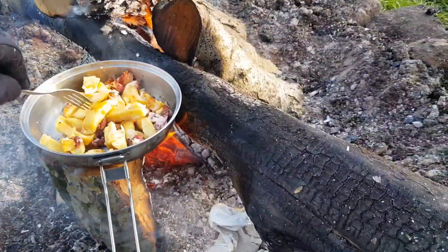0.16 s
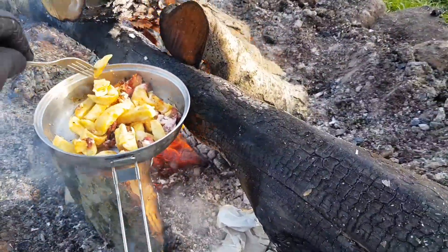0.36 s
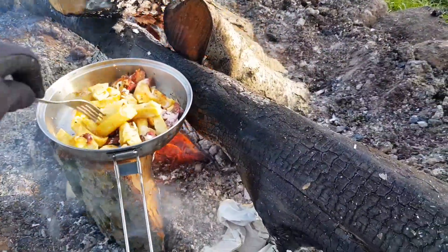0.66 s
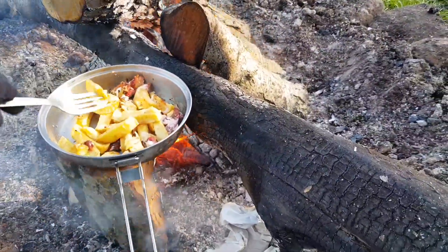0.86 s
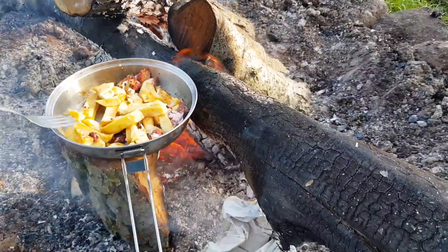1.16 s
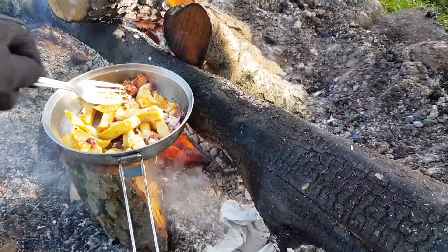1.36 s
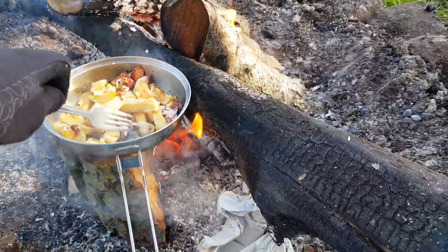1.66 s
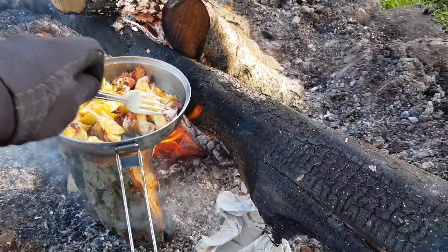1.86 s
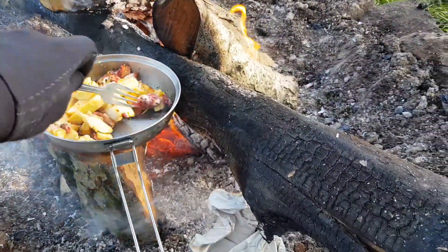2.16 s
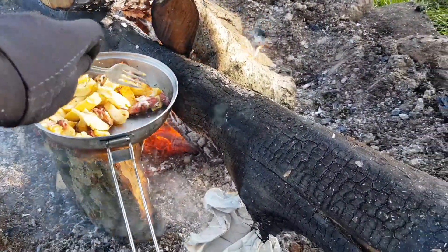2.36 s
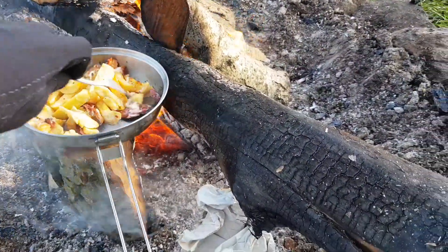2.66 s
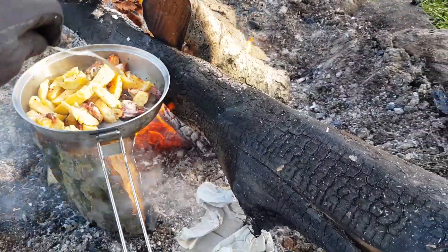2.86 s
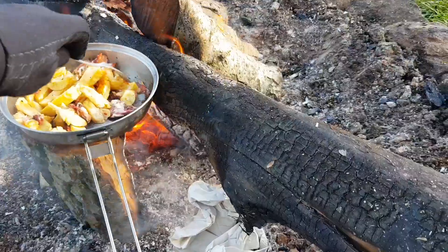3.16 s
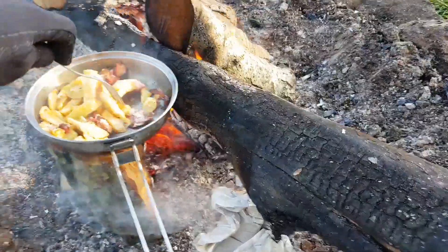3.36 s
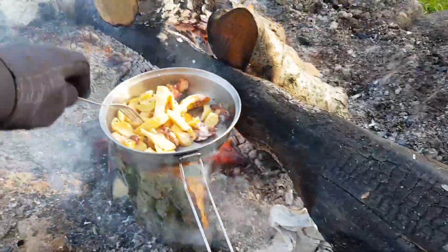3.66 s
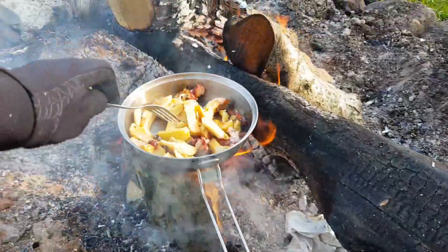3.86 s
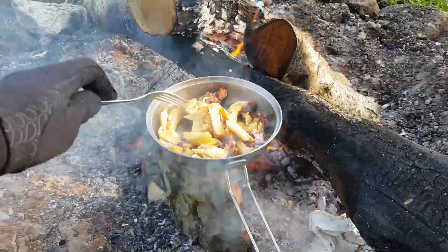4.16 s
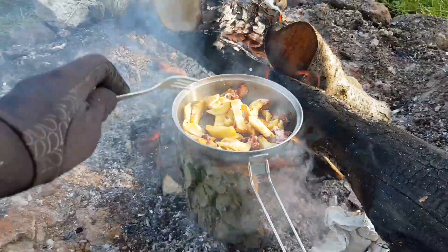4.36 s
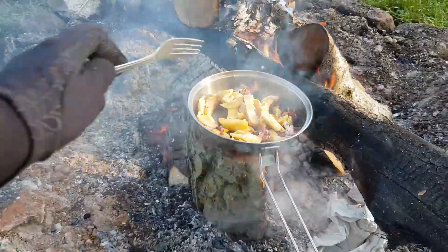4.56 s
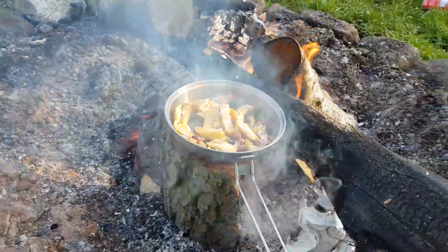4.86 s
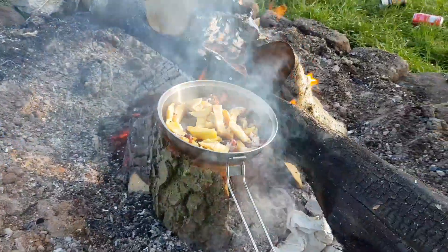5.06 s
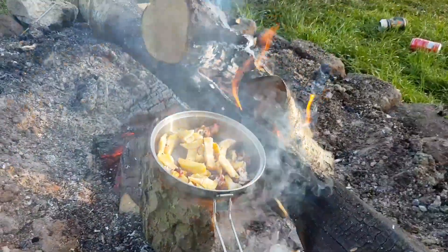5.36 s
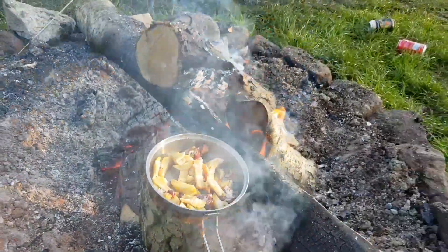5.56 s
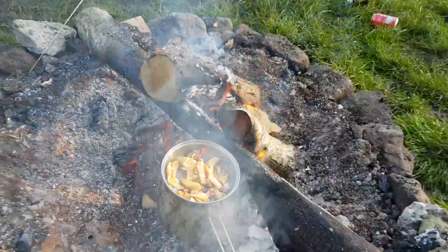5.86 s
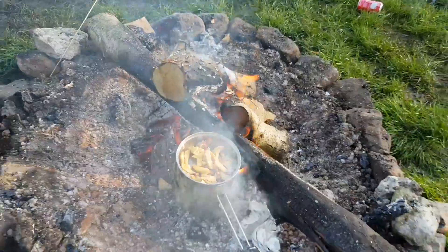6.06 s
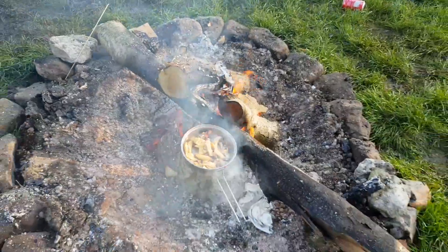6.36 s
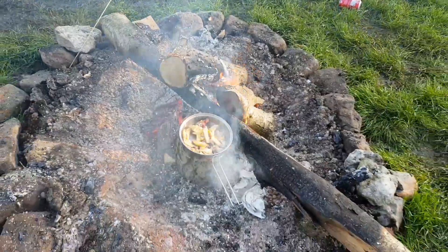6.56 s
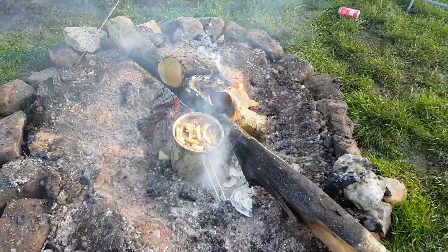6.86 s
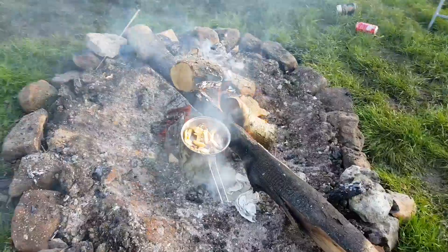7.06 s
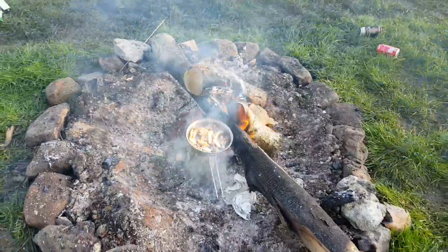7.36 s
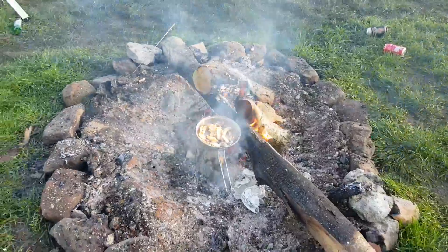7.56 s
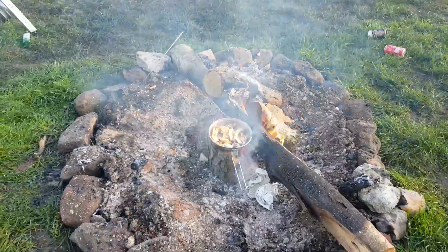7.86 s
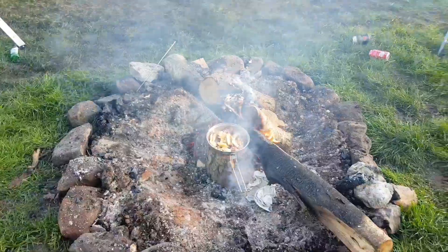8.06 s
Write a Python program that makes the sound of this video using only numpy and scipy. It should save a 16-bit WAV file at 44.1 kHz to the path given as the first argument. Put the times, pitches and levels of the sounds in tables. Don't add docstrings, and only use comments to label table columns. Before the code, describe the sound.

Hot fat snaps brightly over an uneven sizzle in the open air, above a faint steady rumble. Fork tines ring the pan around one second, then stirring makes the frying surge. A second strong swell comes midway. As the stereo microphone retreats, cracks grow sparse and faint; near the end wind buffets the right side while thin birdsong repeats far left.

```python
import sys
import numpy as np
from scipy import signal
from scipy.fft import rfft, irfft
from scipy.io import wavfile
from scipy.ndimage import uniform_filter1d

SR = 44100
rng = np.random.default_rng(int(sys.argv[2]) if len(sys.argv) > 2 else 0)


def makeup_ratio(level_db):
    decades = np.asarray(level_db, float) / 20
    return 10 ** decades


def log_audio(samples):
    frames = np.atleast_2d(samples).T
    limited = np.clip(frames, -1, 1)
    pcm = np.round(limited * 32767).astype(np.int16)
    wavfile.write(sys.argv[1], SR, pcm)


N = 362579

# start_s, left_lead_ms, treble_left_minus_right_db
BEARING = [(0, 0.22, 4.5), (.45, 0.16, 3), (.65, 0.2, 9.5), (.85, .18, 5.5), (1.6, 0.18, 3.5),
           (1.7, .21, 8.5), (2.0, 0.13, 5.5), (2.3, .2, 6.5), (3.36, .205, 4.5), (3.55, .128, 7),
           (3.7, .11, 5.5), (3.88, .1, 4), (4.02, .048, 3), (4.4, .004, 1.5), (4.9, .003, 2),
           (5.02, 0.036, 1.5), (5.8, .07, 4), (6.1, 0.0067, 0.5), (8.22, .005, 5.5)]
ROAM_MS = 0.011


def evened(x):
    return x / np.sqrt(np.mean(x ** 2) + 1e-20)


def read(points, hz):
    f, value = np.transpose(points)
    return np.interp(np.log(hz + 1), np.log(f + 1), value)


def add(mix, start_s, sound):
    part = mix[:, round(start_s * SR):][:, :sound.shape[1]]
    part += sound[:, :part.shape[1]]


def sides(pan_db):
    return makeup_ratio(np.array([pan_db / 2, -pan_db / 2]))


def chirp(length_s, start_hz, end_hz, level_db, rough):
    count = round(length_s * SR)
    flutter = 1 + rough * evened(uniform_filter1d(rng.standard_normal(count), 70))
    waver = 1 + 0.05 * (flutter[::-1] - 1)
    hz = np.linspace(start_hz, end_hz, count) * waver
    tone = np.sin(2 * np.pi * np.cumsum(hz) / SR)
    return makeup_ratio(level_db + 6.0) * np.hanning(count) * flutter * tone


def ports(za, zb, hz, t, roam_ms):
    # pitch_hz, likeness
    likeness = [(600, .8), (1500, .93), (2500, .978), (4000, .985), (5500, .97), (7500, .15), (16000, .1)]
    s, lead_ms, _ = np.transpose(BEARING)
    same = np.clip(read(likeness, hz), 0, 1)[:, None]
    delay_s = (np.interp(t, s, lead_ms) + roam_ms) / 1000
    late = np.exp(-2j * np.pi * hz[:, None] * delay_s)
    return np.array([za, same * late * za + np.sqrt(1 - same ** 2) * zb])


def outdoors():
    # pitch_hz, level_db per Hz
    colour_db = [(20, -33), (40, -12), (53, -3), (75, 1), (101, -8), (129, 3), (145, 0), (162, -9),
                 (255, -13.5), (381, -28.5), (600, -38.5), (1500, -58.5)]
    # start_s, level_db
    loudness = [(0.0, -45.5), (1.35, -46), (3.75, -47.5), (4.0, -47.5), (7.03, -48.5), (7.12, -47.5),
                (8.22, -48.5)]
    lead_rad, same, hush_db = -0.45, 0.97, -70
    frames, hz = N // 1024 + 6, np.fft.rfftfreq(4096, 1 / SR)
    a, b, c, d = rng.standard_normal((frames, 2049, 4)).T
    left = a + 1j * b
    right = same * left * np.exp(-1j * lead_rad) + np.sqrt(1 - same ** 2) * (c + 1j * d)
    z = np.array([left, right]) * makeup_ratio(read(colour_db, hz) - 40 * (hz > 1500))[:, None]
    low = signal.istft(z, nperseg=4096, noverlap=3072)[1][:, 1024:N + 1024]
    low = evened(low) * sides(0.93)[:, None]
    level_db = np.interp(np.arange(N) / SR, *np.transpose(loudness)) + 4
    hush = signal.lfilter([1], [1, -0.5], rng.standard_normal((2, N)))
    return makeup_ratio(level_db) * low + makeup_ratio(hush_db) * hush


def wind():
    # peak_s, peak_db, pitch_hz
    buffets = [(6.768, -31, 107), (6.972, -25, 60.7), (6.995, -16, 84.5), (7.026, -23, 61),
               (7.101, -24.5, 99), (7.126, -16, 119), (7.15, -17, 92), (7.175, -25, 72), (7.231, -23, 69),
               (7.251, -17.5, 76.4), (7.297, -19, 88), (7.354, -26.5, 71), (7.416, -24.5, 72),
               (7.438, -17.5, 89), (7.467, -29, 53), (7.541, -18, 98), (7.566, -21, 69.4),
               (7.61, -19.5, 68.2), (7.633, -16, 110), (7.659, -21.5, 55.5), (7.685, -24, 65),
               (7.804, -29.5, 71), (7.827, -26, 63.6), (7.953, -22.5, 65.5)]
    lee_mean_db, lee_spread_db = -41.5, 6
    out = np.zeros((2, N))
    for (s, db, hz), luck in zip(buffets, rng.random((len(buffets), 3))):
        phase = 2 * np.pi * luck[:2, None]
        lee_db = lee_mean_db + lee_spread_db * (2 * luck[2] - 1)
        half = round(3 * SR / hz)
        u = np.arange(-half, half) * hz / SR
        swing = np.exp(-(u / np.where(u < 0, 0.6, 0.95)) ** 2) * np.cos(2 * np.pi * u + phase)
        edge = makeup_ratio(db + 13.0) * np.exp(-(u / 0.17) ** 2) * np.cos(2 * np.pi * 1.14 * u + phase)
        add(out, s - 3 / hz, (swing + edge) * makeup_ratio([[lee_db], [db]]))
    return out


def bird():
    # start_s, length_s, start_hz, end_hz, level_db
    opening = [(6.875, 0.027, 3950, 4900, -46), (6.995, 0.023, 2860, 3570, -60),
               (7.049, 0.027, 6300, 6830, -55), (7.051, 0.024, 5300, 5730, -63),
               (7.115, 0.026, 3400, 5330, -45), (7.222, 0.044, 3400, 4480, -54.5),
               (7.27, .022, 5360, 7940, -60), (7.471, 0.028, 4350, 5000, -50),
               (7.286, 0.048, 6000, 5500, -62), (7.344, 0.02, 5100, 4530, -56),
               (7.354, 0.026, 4630, 4480, -50)]
    # offset_s, length_s, start_hz, end_hz, level_db
    phrase = [
        (0, .03, 6530, 5720, -66),
        (0.011, 0.033, 5900, 5680, -60.5),
        (0.041, 0.0137, 4720, 4920, -57.5),
        (0.054, .025, 4110, 3580, -59.5),
        (.062, .055, 3800, 2500, -68.5),
        (-.008, .025, 7100, 6300, -69),
        (.047, .02, 4900, 4020, -64),
    ]
    phrase_starts = [7.438, 7.591, 7.757, 7.921, 8.091]
    song = np.zeros((1, N))
    for s, *note in opening:
        add(song, s, chirp(*note, rough=0.25)[None])
    for start_s in phrase_starts:
        for offset_s, *note in phrase:
            add(song, start_s + offset_s, chirp(*note, rough=0.6)[None])
    t = np.arange(6000) / SR
    echoes = rng.standard_normal((2, 6000)) * makeup_ratio(-38 - 60 * t / 0.25)
    direct = np.array([song[0], np.roll(song[0], 15)]) * sides(4)[:, None]
    return direct + signal.oaconvolve(song, echoes, axes=1)[:, :N]


def squeaks():
    # start_s, length_s, start_hz, end_hz, level_db
    scrapes = [
        (2.007, 0.022, 424, 547, -44),
        (2.012, 0.0448, 499, 1080, -48.5),
        (2.036, 0.031, 940, 1130, -44.5),
        (2.013, 0.032, 707, 800, -54),
        (2.018, 0.076, 4280, 4500, -48.5),
        (2.033, 0.063, 3600, 3850, -55),
        (4.461, 0.032, 628, 625, -51),
    ]
    out = np.zeros((2, N))
    for s, *scrape in scrapes:
        add(out, s, chirp(*scrape, rough=0.5) * sides(1.5)[:, None])
    return out


def fork():
    # start_s, peak_db
    strikes = [
        (1.085, -32.5),
        (1.109, -39),
        (1.148, -34.5),
        (1.165, -37),
        (3.155, -44),
        (3.28, -41),
    ]
    # pitch_hz, level_db, t60_s
    modes = [(1220, -4.5, 0.54), (1940, 9, 0.14), (2030, 11, 0.2), (3800, -2, 0.12), (4340, -16, .15),
             (3900, -10, 0.12), (4900, -12, 0.19)]
    out, t = np.zeros((2, N)), np.arange(12000) / SR
    for s, db in strikes:
        ring = sum(makeup_ratio(d - 60 * t / t60) * np.sin(2 * np.pi * f * t) for f, d, t60 in modes)
        rattle = 1 + 1.03 * evened(uniform_filter1d(rng.standard_normal(len(t)), 60))
        ring *= makeup_ratio(db) / abs(ring).max() * rattle
        add(out, s, np.array([ring, np.roll(ring, 8) * (t > 8 / SR)]))
    return out


def ember():
    # peak_s, peak_db, pitch_hz
    burst = (.937, -17.5, 194)
    out = np.zeros((2, N))
    s, db, hz = burst
    u = np.arange(1200) / SR - 0.002
    push = np.where(u < 0, np.exp(u / 0.000055), np.exp(-u / 0.0028) * np.cos(2 * np.pi * hz * u))
    add(out, s - 0.002, makeup_ratio(db) * push * sides(2.9)[:, None])
    return out


def drops():
    # peak_s, crack_peak_db, body_peak_db, crack_left_minus_right_db
    big = [(.2536, -14.5, -34, 12), (.3255, -14, -35, 16), (.477, -3.5, -20, 6.5), (.6076, -11.5, -34, 7),
           (.623, -6.5, -39, 4), (.8391, -6, -18, 10.5), (.9368, -11.5, -21, 3), (1.0875, -9, -31, -4),
           (1.2958, -9.5, -31, 14), (1.5619, -8.5, -24.5, 9), (2.1194, -7, -23, 4), (2.1966, -9, -28.5, 11),
           (2.6432, -19, -25, 23), (2.9296, -12, -28, 7), (3.1295, -11, -34, 2), (3.1577, -10, -19.5, -1.5),
           (3.2947, -22, -25, 9), (3.9818, -8.5, -46, 5), (3.9985, -2, -35, 11), (4.12, -24, -30, 4),
           (4.4721, -10, -20, 8), (4.7086, -22, -17, 4), (4.9812, -8.5, -24, 7), (4.9873, -22, -24, 1.5),
           (5.1105, -11.5, -24.5, 5), (5.5966, -8.5, -22, 3), (6.1217, -13, -29, -3.5),
           (6.3598, -10, -30.5, 2), (6.8261, -17.5, -29, 14), (6.8362, -15, -25, 0.5)]
    # peak_s, crack_peak_db
    spits = [(.1793, -13), (.5031, -8), (.5133, -11), (.7784, -15), (1.2085, -14.5), (1.4067, -18),
             (1.4889, -12), (1.5202, -15), (2.2205, -11), (2.8395, -14), (2.9507, -18.5), (3.1041, -16),
             (3.3343, -17), (3.3435, -15), (3.669, -19), (3.4197, -22), (3.6763, -9), (4.2911, -15),
             (4.6683, -16), (4.734, -15.5), (4.72, -20), (4.7925, -23), (4.866, -18), (4.888, -23),
             (4.9595, -25), (5.0325, -21), (5.084, -24), (3.2945, -15), (3.594, -15), (3.525, -20),
             (4.022, -17), (4.05, -17), (4.068, -15), (5.0565, -12.5), (5.2527, -16), (5.4668, -11.5),
             (5.6091, -10.5), (5.9904, -17), (6.2648, -20), (6.4873, -14.5), (6.8983, -20.5),
             (7.0673, -19.5), (7.3905, -27), (7.5531, -27), (7.6876, -27.5)]
    # onset_s, crack_peak_db, pitch_hz
    ticks = [(0.0774, -18, 8020), (0.2937, -27, 12900), (0.3673, -22, 8600), (0.4194, -20, 13500),
             (0.6533, -24, 10200), (0.8859, -18, 13600), (1.0121, -18, 12600), (1.038, -24, 9570),
             (1.0644, -24, 10200), (1.2276, -28, 8370), (1.261, -20.5, 8660), (1.3688, -22, 8200),
             (1.4002, -14.5, 9980), (1.482, -29, 8730), (1.6806, -24, 13400), (1.7305, -18, 10200),
             (1.7903, -33, 9560), (1.8866, -24, 11200), (1.9335, -17.5, 12300), (1.9784, -20, 9850),
             (2.136, -13.5, 13200), (2.2503, -16, 8470), (2.3466, -19, 11700), (2.4109, -23, 9990),
             (2.4399, -24, 10400), (2.6, -24, 12800), (2.616, -19.5, 7930), (2.6618, -19, 14000),
             (3.0016, -22.5, 8590), (3.026, -27, 9200), (3.271, -19, 10600), (3.7559, -14.5, 8010),
             (3.7986, -15.5, 10100), (3.9498, -13, 10700), (4.2212, -19, 12500), (4.2642, -25, 10000),
             (4.33, -25, 8750), (4.36, -19.5, 10300), (4.4627, -11, 9640), (4.5343, -21, 11900),
             (4.6214, -38, 9900), (4.6967, -20, 10400), (4.7555, -23, 8900), (4.7688, -17, 9540),
             (4.8539, -23, 10300), (5.01, -19.5, 12200), (5.1961, -25, 8000), (5.303, -29, 12300),
             (5.3594, -25, 8130), (5.4834, -23, 11200), (5.5407, -23, 8680), (5.5618, -24, 12900),
             (5.6292, -20, 10500), (5.6565, -22, 8050), (5.8034, -21, 8160), (6.0412, -20.5, 8410),
             (6.1766, -23, 8600), (6.224, -22.5, 8620), (6.337, -19, 8980), (6.535, -26.5, 8480)]
    tick_rise_s, tick_gain_db = 0.0012, 3
    under_crack_db, body_spread_db, pan_spread_db = -16, 1.5, 4
    crack_hz, crack_spread = 10850, 0.11
    onset_s, tick_db, tick_hz = np.transpose(ticks)
    s, db = np.r_[spits, np.c_[onset_s + tick_rise_s, tick_db + tick_gain_db]].T
    luck = rng.standard_normal((len(s), 2))
    at_s, _, pan_db = np.transpose(BEARING)
    place_db = np.interp(s, at_s, pan_db) + pan_spread_db * luck[:, 1]
    body_db = db + under_crack_db + body_spread_db * luck[:, 0]
    rows = np.r_[big, np.c_[s, db, body_db, place_db]]
    pitch_hz = crack_hz * np.exp(crack_spread * rng.standard_normal(len(big) + len(spits)))
    return np.c_[rows, np.r_[pitch_hz, tick_hz]]


def pops():
    out, hz, t = np.zeros((2, N)), np.fft.rfftfreq(512, 1 / SR), (np.arange(512) - 88) / SR
    spray = 0.43 * np.exp(-abs(t) / np.where(t > 0, 0.0018, 0.0003))
    shape = np.exp(-(t / 0.0002) ** 2) + spray
    snap = np.array([t == 0, t == 3 / SR])
    rows = drops()
    for (s, db, body_db, pan_db, pitch_hz), hiss in zip(rows, rng.standard_normal((len(rows), 2, 512))):
        z = rfft(0.43 * hiss * shape + snap)
        peak = 0.4 + np.exp(-(np.log(hz / pitch_hz + 1e-9) / 0.25) ** 2)
        crack = irfft(z * np.clip(hz / 4000 - 0.5, 0, 1) * peak)
        crack *= sides(pan_db)[:, None] / abs(crack).max(1)[:, None]
        body = z * np.exp(-(np.log(hz / 2300 + 1e-9) / 0.99) ** 2)
        body = ports(*body[:, :, None], hz, s, ROAM_MS * hiss[0, 0])[:, :, 0]
        body = irfft(body) * sides(1.3 * pan_db)[:, None]
        add(out, s - 88 / SR, makeup_ratio(db - 4.5) * crack + makeup_ratio(body_db - 1.0) * body / abs(body).max())
    return out


def heat(t):
    # start_s, fizz_db, splutter_relative_db
    sizzle = [(0.0, -41, 0.5), (.7, -43, -0.5), (1.7, -42.5, 0.5), (2.4, -46, 0), (3.1, -46, -3.5),
              (3.45, -38.5, -2.5), (4.1, -36, -3.5), (4.25, -43, -4), (4.7, -42, -2), (5.2, -44, -2),
              (5.7, -46, -1), (6.15, -51.5, -0.5), (6.75, -52, -0.5), (7.1, -63, 0), (7.65, -63, -2.5),
              (8.06, -68.5, -15), (8.22, -68.5, 2)]
    # top_s, half_length_s, level_db
    surges = [(0.388, 0.21, -7), (0.458, 0.01, -14), (0.51, 0.065, 6.5), (0.575, 0.043, 0.5),
              (0.984, 0.14, -5), (1.09, 0.019, 9.5), (1.17, .036, 3.5), (1.209, 0.022, -5),
              (1.696, 0.079, 2.5), (1.855, 0.048, -3.5), (2.087, 0.13, 9), (2.249, 0.046, 8),
              (2.72, 0.14, 6.5), (2.883, 0.085, -3.5), (3.298, 0.056, 6), (3.584, 0.072, 4),
              (3.738, 0.029, -3), (4.405, 0.063, 3), (4.45, .01, -3), (4.467, .016, 6),
              (4.175, 0.034, -4.5), (3.103, 0.052, -0.5), (2.397, 0.079, 2), (1.297, 0.064, -4),
              (3.27, 0.022, 1.5), (4.716, .03, 2.5), (5.196, 0.037, 1.5), (.31, 0.029, -4),
              (0.336, 0.017, -2), (3.138, 0.012, 0), (1.245, .03, 1), (5.226, 0.024, -10.5),
              (5.62, 0.17, 3), (5.89, 0.054, -5.5), (6, 0.088, 6), (6.337, 0.11, 4.5), (6.487, 0.017, 6),
              (6.83, 0.041, -3), (6.954, 0.044, -3.5), (7.046, 0.06, 3.5), (7.33, 0.1, 7), (7.54, 0.1, 2.5),
              (8.192, 0.057, 9)]
    drying = 0.034
    s, fizz_db, splutter_db = np.transpose(sizzle)
    surge_db = sum(db * np.clip(1 - abs(t - top) / half, 0, 1) for top, half, db in surges)
    return np.interp(t, s, fizz_db) + surge_db, np.interp(t, s, splutter_db) - drying * surge_db


def bubbles(per_s, spread_db, ms):
    size = makeup_ratio(spread_db * np.minimum(rng.exponential(1, N), 3.5)) ** 2
    size = size * (rng.random(N) < per_s / SR)
    t = np.arange(-64, 192) / SR * 1000 / ms
    burst = np.exp(-(t * np.where(t < 0, 2, 1)) ** 2)
    tail = 0.13 * np.exp(-t / 6) * (t > 0)
    power = abs(signal.oaconvolve(size, burst + tail, "same"))
    return power / power.mean()


def frying():
    # pitch_hz, level_db per Hz
    fizz_colour = [(400, -15), (620, -23), (800, -18), (1030, -12), (1300, -18.5), (1850, -9), (4500, -5.5),
                   (7000, -7.5), (7900, -1.5), (10400, -2), (13000, -3), (15500, -6)]
    # start_s, length_s, level_db
    jet = (2.006, 0.058, 4.8)
    roam_s = 0.04
    both = bubbles(per_s=200, spread_db=4.0, ms=0.44)
    steam = 0.16 + 0.5 * np.clip((heat(np.arange(N) / SR)[0] + 42) / 8, 0, 1)
    high = np.sqrt(steam + 0.49 * both + 0.24 * bubbles(per_s=1000, spread_db=5.0, ms=0.35))
    low = np.sqrt(steam + 0.29 * both + 0.25 * bubbles(per_s=370, spread_db=4.0, ms=0.61))
    hiss = rng.standard_normal((2, 2, N)) * np.array([high, low])[:, None]
    hz, t, z = signal.stft(hiss, SR, nperseg=256, noverlap=192)
    share = np.clip(np.log(hz / 6000 + 1e-9) / 0.26, 0, 1)[:, None]
    fizz_db, wet_db = heat(t)
    z = np.sqrt(share) * z[0] + np.sqrt(1 - share) * makeup_ratio(wet_db) * z[1]
    colour = makeup_ratio(read(fizz_colour, hz) - 60 * (hz < 350))
    roam = uniform_filter1d(rng.standard_normal(len(t)), size=round(roam_s * SR / 64))
    pair = ports(*z, hz, t, ROAM_MS * evened(roam)) * evened(colour)[:, None]
    s, _, pan_db = np.transpose(BEARING)
    lean_db = np.interp(t, s, pan_db) * (0.1 + 0.8 * share)
    pair *= makeup_ratio(fizz_db + 5.0) * sides(lean_db)
    start_s, length_s, jet_db = jet
    pair *= makeup_ratio(jet_db * (t > start_s) * np.clip(1 - ((t - start_s) / length_s) ** 2, 0, 1))
    return signal.istft(pair, nperseg=256, noverlap=192)[1][:, :N]


def scene():
    return outdoors() + wind() + bird() + squeaks() + fork() + ember() + pops() + frying()


def low_pass(x):
    return signal.sosfilt(signal.butter(12, 16810, fs=SR, output="sos"), x)


def record(dry):
    cut = signal.sosfilt(signal.butter(2, 25, "high", fs=SR, output="sos"), dry)
    band_limit = signal.firwin(401, 15800, window=("kaiser", 9), fs=SR)
    return low_pass(signal.oaconvolve(cut, band_limit[None], "same"))


dry = scene()
out = record(dry)
log_audio(out)
```